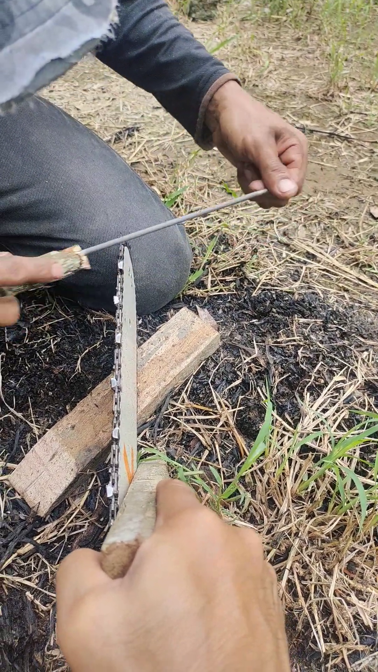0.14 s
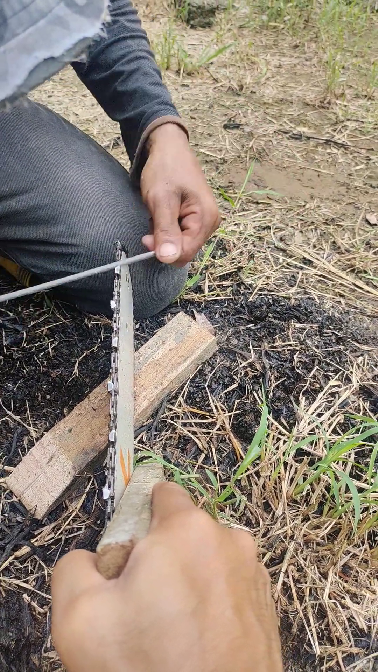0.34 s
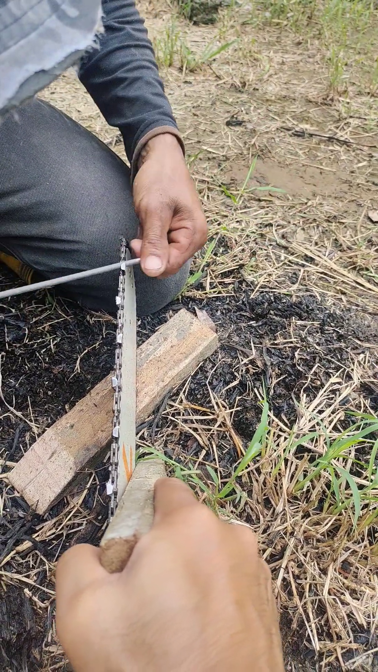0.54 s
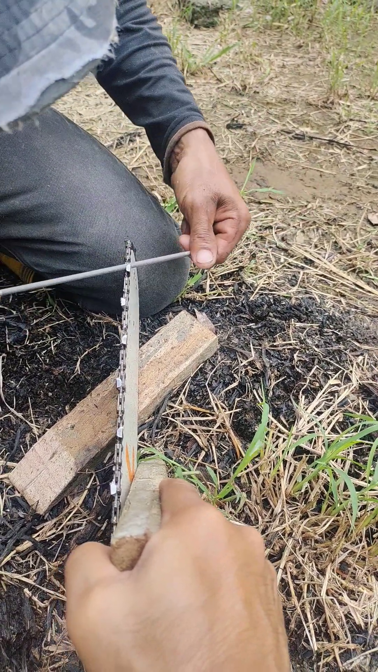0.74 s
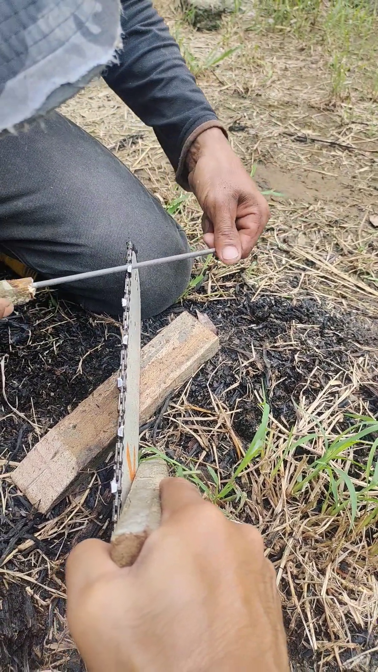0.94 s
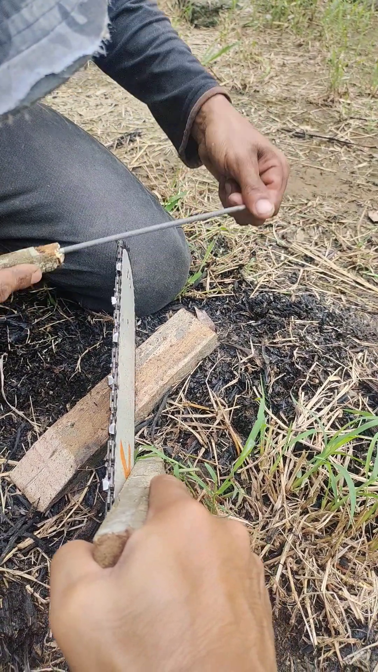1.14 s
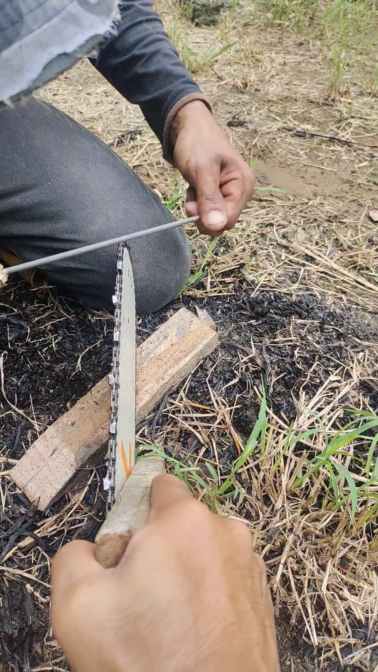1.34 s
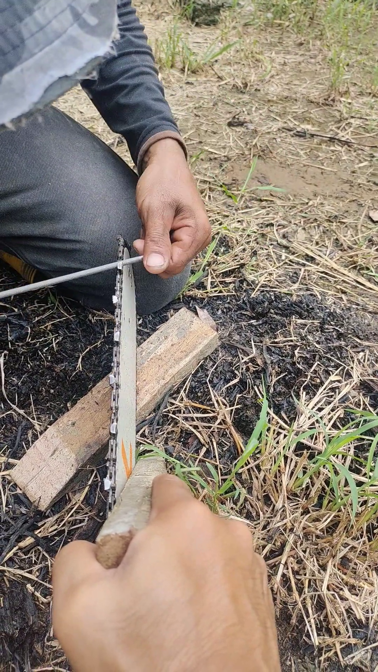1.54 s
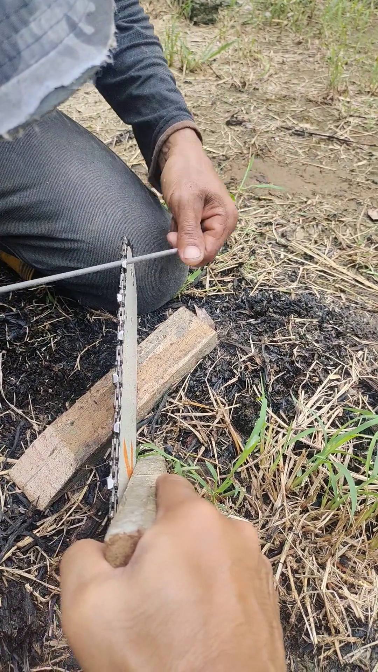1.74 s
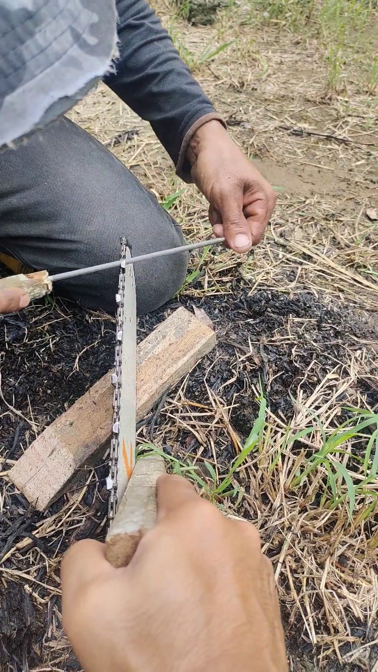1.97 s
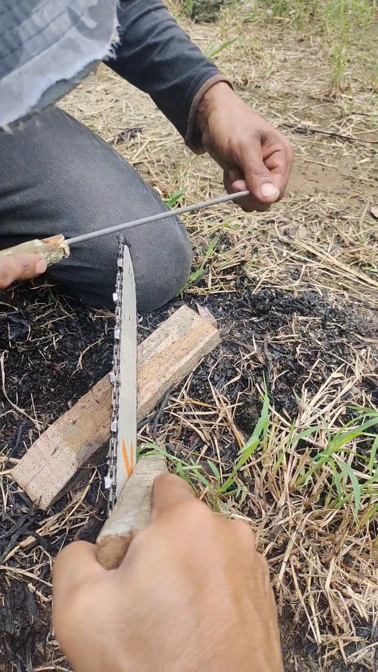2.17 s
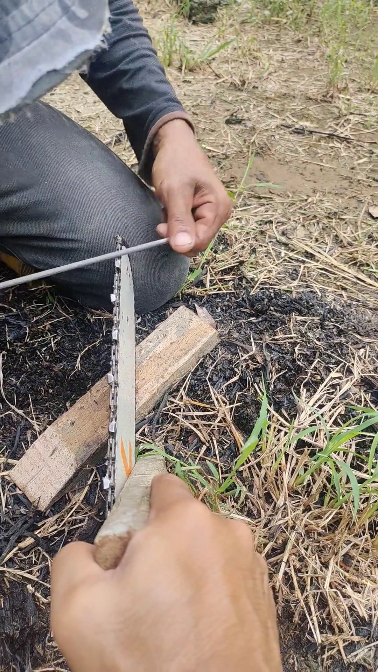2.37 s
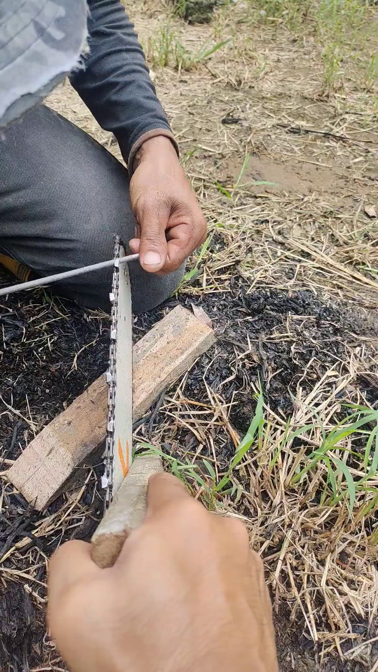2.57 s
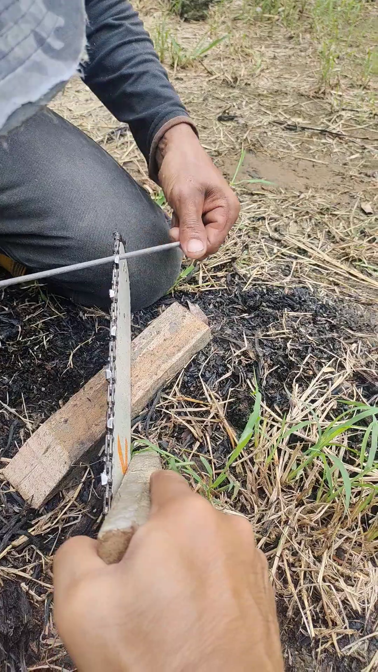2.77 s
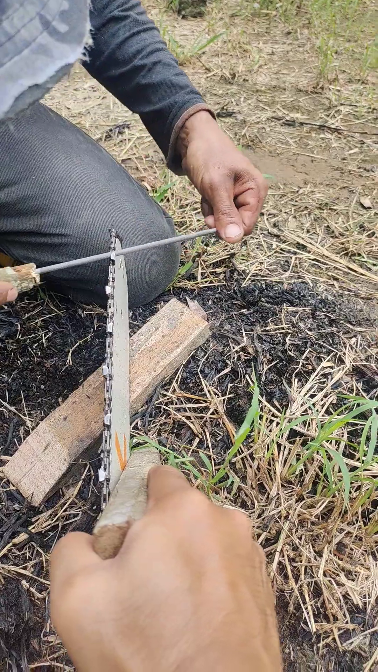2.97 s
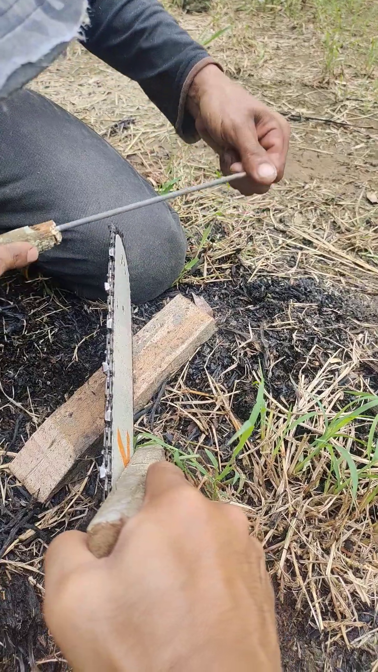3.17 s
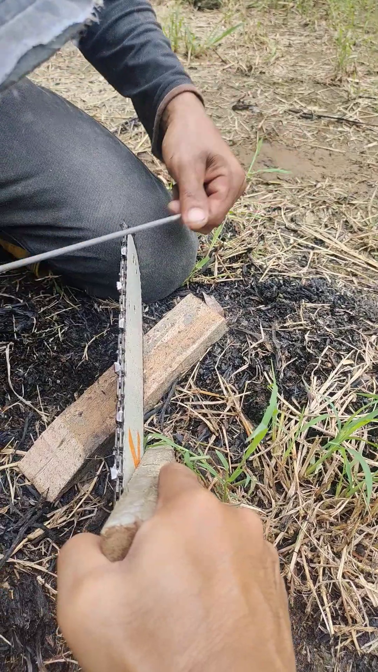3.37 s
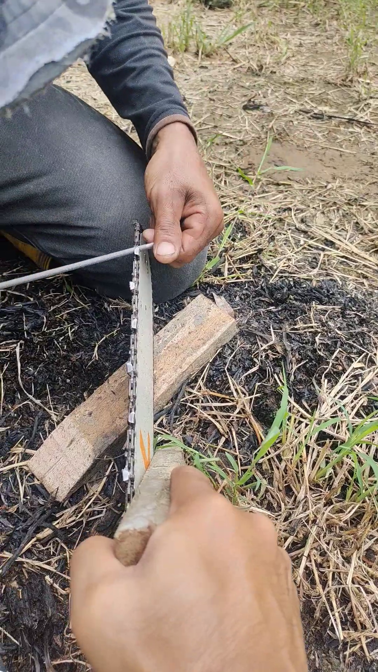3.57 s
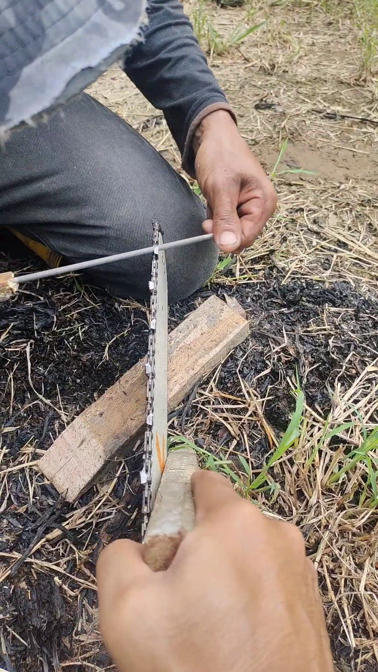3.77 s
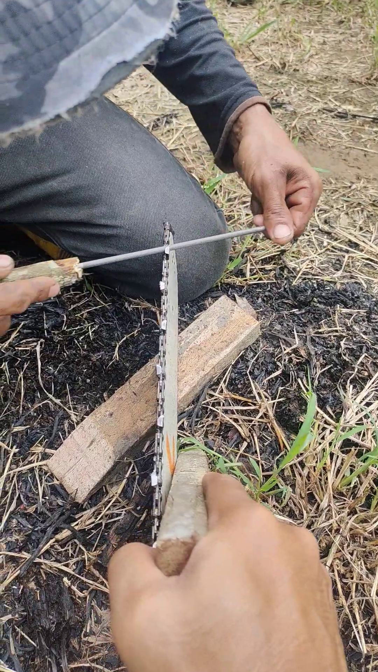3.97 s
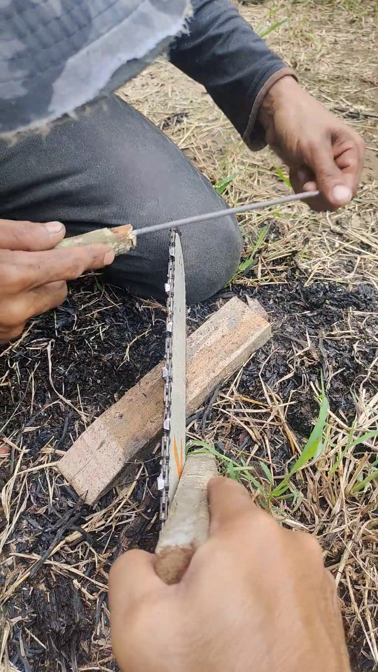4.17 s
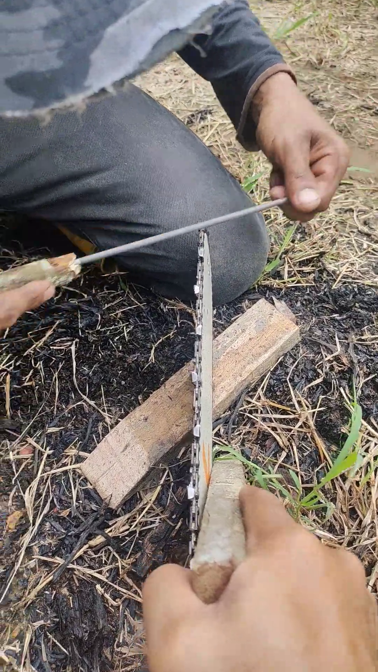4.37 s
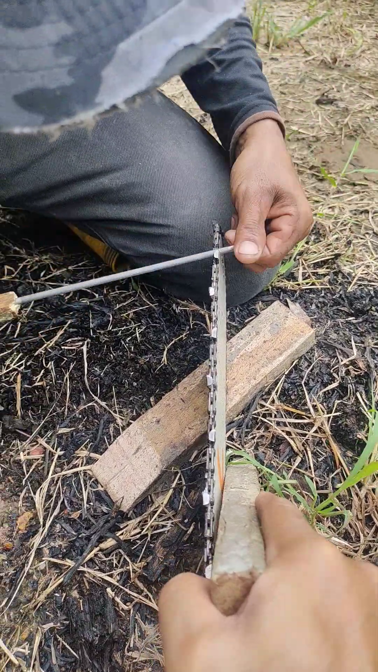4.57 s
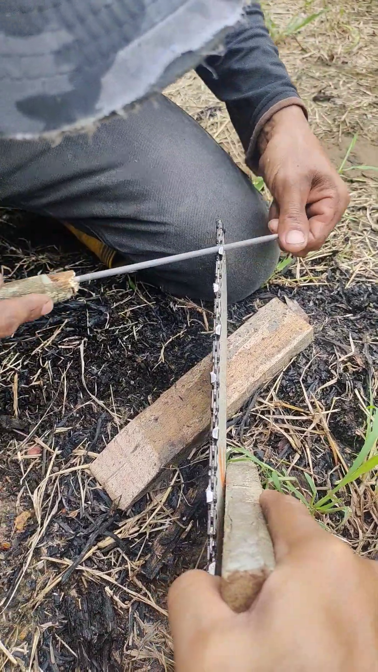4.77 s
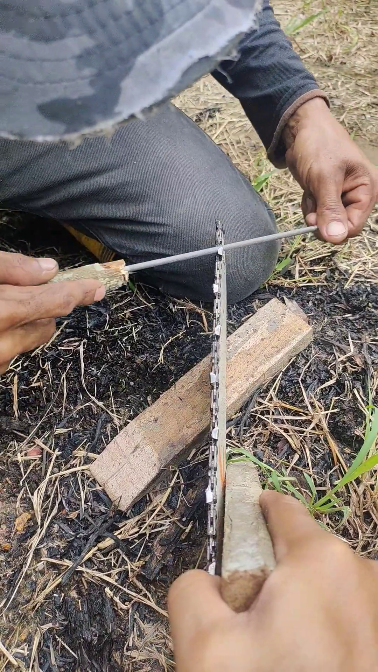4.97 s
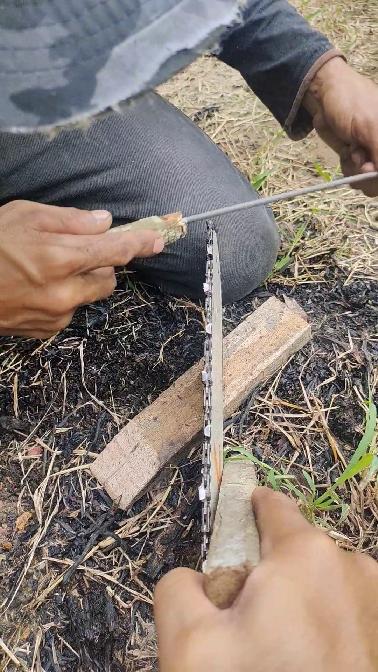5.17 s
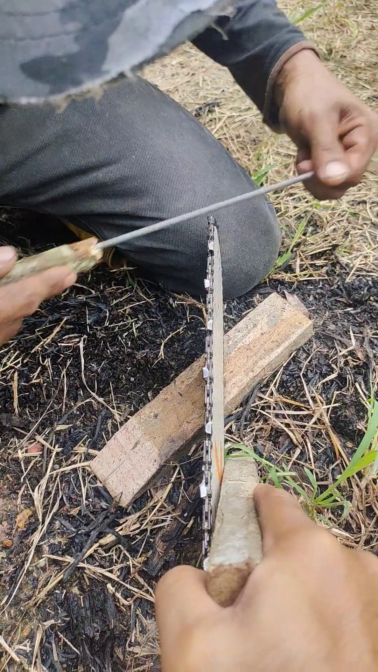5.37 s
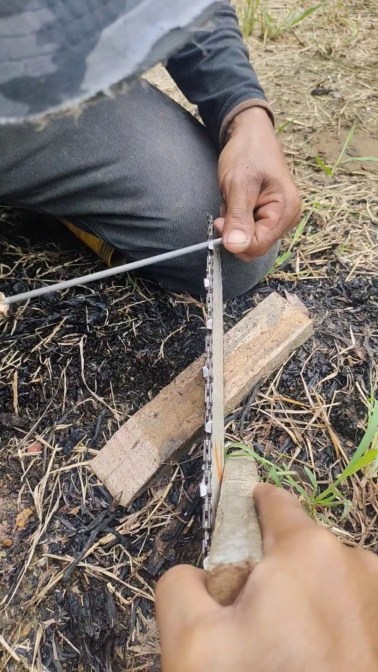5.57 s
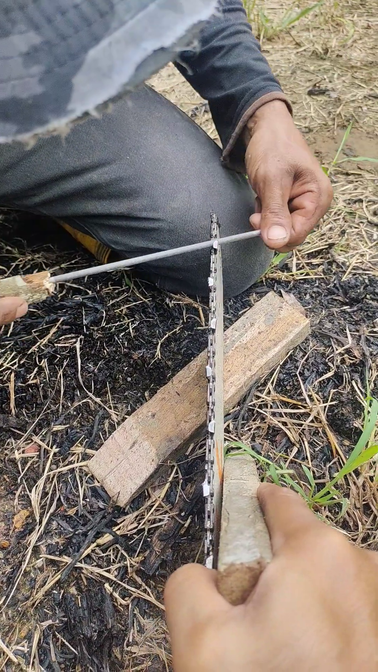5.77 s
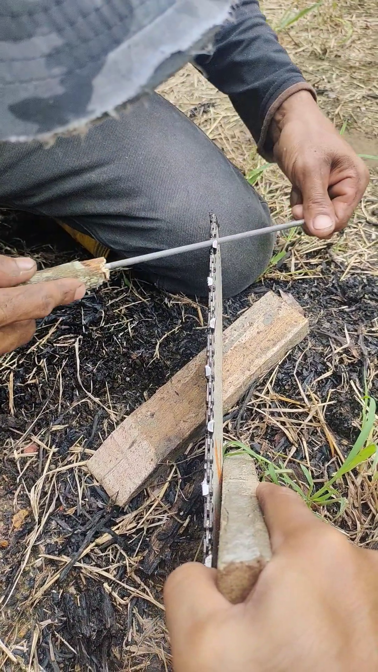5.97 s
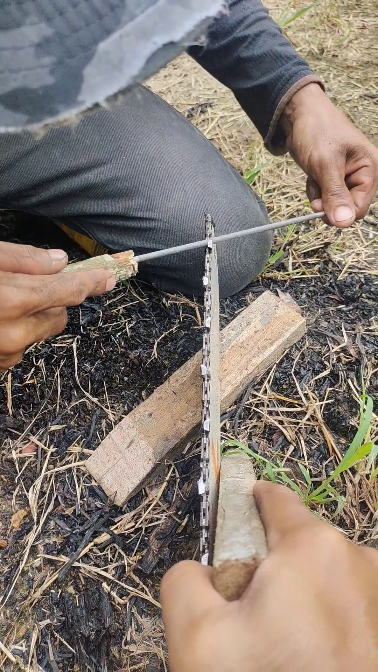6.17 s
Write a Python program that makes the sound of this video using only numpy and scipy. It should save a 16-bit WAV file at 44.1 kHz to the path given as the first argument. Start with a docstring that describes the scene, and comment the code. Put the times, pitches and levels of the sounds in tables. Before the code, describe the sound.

Six full filing strokes follow the tail of an earlier one, heard by a close stereo microphone in dry open air. Each begins with a sharp metallic tick and a brief gritty backward skid, then a longer forward rasp, bright hiss over a buzzing low-mid hum leaning left. Some strokes catch and stutter. Between them only faint rumble, air and thin insect noise remain.

```python
"""Outdoors, close to a two-port microphone, a round file sharpens a saw chain.
Each time the file lands on the cutter, skids back and slows, then rasps forward and lifts off.
Tooth impulses excite resonances of the guide bar and the steel; friction is shaped noise.
Behind it are a low rumble that swells once, soft air and faint insects, all made of filtered noise."""
import sys
import numpy as np
from scipy import signal
from scipy.fft import rfft, irfft, next_fast_len
from scipy.io import wavfile
from scipy.ndimage import uniform_filter1d, map_coordinates

SR = 44100
rng = np.random.default_rng(int(sys.argv[2]) if len(sys.argv) > 2 else 0)


def unload_audio(sound):
    """Save the sound as a 16-bit wav file, at the path given as the first command line argument."""
    columns = np.transpose(np.atleast_2d(sound))
    # keep every value between -1 and 1, then stretch to whole-number steps
    steps = np.round(np.clip(columns, -1, 1) * 32767)
    wavfile.write(sys.argv[1], SR, steps.astype(np.int16))


N = 274302

# left and right port: half of any difference goes to each
SIDE = np.array([[.5], [-.5]])

# Levels in the tables are nominal: each layer adds its own gain.
# resonances of guide bar and chain: (frequency [Hz], width [Hz], level [dB],
# left minus right [dB], left phase lead [rad])
BAR_MODES = [(164, 63, -16, 19, 0.3), (355, 76, 3, 6, 0.97), (765.7, 167, -9, 6, 7.52),
             (887, 270, -11, 11, 3.35), (1228, 244, -18.5, 15, 4.13), (1524, 222, -12.5, 10.5, 4),
             (1619, 77, -7, 9, 4.5), (2313, 600, -25.5, 13.5, 1.37), (2602, 197, -23.5, -10.5, 0.94)]
# spectrum of the cutting hiss: (frequency [Hz], density [dB per Hz])
HISS_SPECTRUM = [(200, -23), (550, 0), (1400, 8), (2000, 5.5), (3100, -2.5), (4000, 4.5), (5200, -2),
                 (7000, 0.5), (9000, -2), (10500, -1), (12200, 0.5), (13400, -3), (14700, -1.5),
                 (16000, -16.5)]
# moments when the bite of the teeth changes: (time [s], nominal change [dB])
BITES = [(.615, 4.5), (.793, -1), (1.768, 0), (1.848, 3), (1.936, 5.5), (2.801, 4.5), (2.966, 5),
         (3.84, 2.5), (3.882, 5), (4.738, 4), (4.85, 5), (4.92, 4), (5.055, 5), (5.68, 5), (5.925, 3)]


def pushes():
    """Forced vibration and chip fracture: the blows of the teeth drive the bar while tearing chips hiss."""
    t = np.arange(N) / SR
    pressure, hiss, swell = hand()
    dig_db = sum(db * np.exp(-((t - s) / 0.017) ** 2) for s, db in BITES)
    grip = unit(amp(1.5 * wobble(170)))
    tooth_rate = 850 * amp(1.5 * wobble(8))
    force = teeth(tooth_rate, scatter=.5, uneven_db=4.0)

    # chips snap off as single sharp grains over the even friction
    snaps = teeth(np.full(N, 520.), scatter=.5, uneven_db=5.5)
    chips = unit(amp(0.62 * wobble(600)) + amp(-11.0) * np.abs(snaps))

    # a bite stirs the boom most and the hiss least
    hum = amp(-1.0 + 1.76 * dig_db) * swell * boom()
    low_modes = amp(-4.0) * pressure * ring(force, BAR_MODES[:2])
    rasp = wander(ring(force * grip, BAR_MODES[2:]), depth_db=4.5)
    body = amp(2.0 + dig_db) * pressure * steady(rasp, size=3000)
    tearing = spray(amp(6.5 + 0.29 * dig_db) * hiss * chips * grip, HISS_SPECTRUM)
    return hum + low_modes + body + wander(tearing, depth_db=5.5)


# forward strokes: (start [s], stop [s], pressure on the cutter [dB], cutting hiss [dB],
# bar boom [dB], easing of the hand [dB/s]; negative easing is a growing push)
STROKES = [(-0.4, 0.028, -48, -55, -49, 5), (0.518, 1.064, -46.5, -50.5, -45, 14),
           (1.631, 2.052, -45, -51, -44, 9.5), (2.574, 3.063, -47.3, -53.5, -44, -1),
           (3.592, 4.09, -46.5, -53.5, -45, -1.5), (4.616, 5.075, -46.5, -52, -47.5, 6.5),
           (5.64, 6.223, -47, -50.5, -45, 13.5)]
# the pressure comes on quickly, the hiss waits for the file to gather speed
PRESS_S, SPEED_UP_S, RELEASE_S = 0.031, 0.075, 0.019
# the file slows along the stroke and its hiss sags; the bar booms most in mid-stroke
HISS_SAG_DB_PER_S, BOOM_ARCH_DB = 4.0, 1
# the bar's rasp follows only this share of the easing
RASP_EASE_SHARE = 0.42


def hand():
    """Contact force and sliding speed set the pressure, hiss and boom envelopes of each forward stroke."""
    t = np.arange(N) / SR
    pressure, hiss, swell = np.zeros((3, N))
    for start, stop, pressure_db, hiss_db, boom_db, ease_db_per_s in STROKES:
        age = np.clip(t - start, 0, stop - start)
        off_centre = 2 * age / (stop - start) - 1
        pressed = held(start, stop, PRESS_S, RELEASE_S)
        moving = held(start, stop, SPEED_UP_S, RELEASE_S)
        pressure += pressed * amp(pressure_db - RASP_EASE_SHARE * ease_db_per_s * age)
        hiss += moving * amp(hiss_db - (ease_db_per_s + HISS_SAG_DB_PER_S) * age)
        swell += pressed * amp(boom_db - BOOM_ARCH_DB * off_centre ** 2)
    return pressure, hiss, swell


def boom():
    """Bending resonance of the bar: a narrow-band, restless hum, stronger at the left port."""
    slow = wobble(60) + 1j * wobble(60)
    quick = wobble(150) + 1j * wobble(150)
    sway = steady((slow + 0.37 * quick)[None], size=1800)
    hum_hz = 360 + 9 * wobble(9)
    hum = sway * np.exp(2j * np.pi * np.cumsum(hum_hz) / SR)
    left_lead = np.exp(1j * SIDE * 0.9)  # radians
    return unit(np.real(hum * left_lead)) * amp(SIDE * 5.3)


# backward skids: (start [s], stop [s], rattle [dB], share of the skid at which it is firmest [0-1],
# steel [dB])
SKIDS = [(0.369, 0.489, -41.5, 0.45, -46.5), (1.459, 1.59, -41.5, 0.36, -50),
         (2.421, 2.535, -42, 0.27, -46.5), (3.439, 3.556, -37, 0.28, -48), (4.468, 4.583, -40.5, 0.28, -44),
         (5.475, 5.6, -40.5, 0.14, -42.5)]
# spectrum of the grating: (frequency [Hz], density [dB per Hz])
GRATE_SPECTRUM = [(250, -31), (560, -5), (750, 6), (1100, 11), (1500, 7.5), (2200, -11), (3200, -64),
                  (6000, -44)]
# resonances of file and cutter steel: (frequency [Hz], width [Hz], level [dB],
# left minus right [dB], left phase lead [rad])
STEEL_MODES = [(1200, 200, -3, -15, 0), (2255, 910, 3, 3, 2), (2853, 50, -2.5, -18, 7.5),
               (3790, 75, 4.5, -9, 2), (4116, 840, 3.5, -0.5, 1.5), (4700, 49, 0, 4, 4),
               (6030, 260, -1, 0, -1.5), (8200, 1100, -10.5, -13.5, 1), (10010, 620, -2.5, -5, -1.5),
               (12600, 480, -11, 5, 4.5)]
# spectrum of steel scuffing on steel: (frequency [Hz], density [dB per Hz])
SCUFF_SPECTRUM = [(200, -47), (600, 7), (1500, 9), (3200, 3.5), (4500, -1.5), (7000, 1.5), (9000, -5.5),
                  (11000, -7), (13500, -13), (16000, -11)]


def skids():
    """Tooth-passing excitation: drawn back lightly, the file rattles more slowly and dully until it stops."""
    t = np.arange(N) / SR
    speed, rattle, steel = np.zeros((3, N))
    for start, stop, rattle_db, firmest, steel_db in SKIDS:
        on = (t >= start) & (t < stop)
        gone = (t[on] - start) / (stop - start)
        speed[on] = 1 - gone
        rattle[on] = amp(rattle_db - 20 * (gone - firmest) ** 2) * np.clip(speed[on] / 0.27, 0, 1)
        # the treble needs speed and is the first to go
        steel[on] = amp(steel_db - 13.3 * gone - 20 * gone ** 2)

    # the tooth rate, heard as a rough falling pitch, follows the speed
    force = rattle * teeth(350 + 1200 * speed, scatter=0.21, uneven_db=4.0)
    chatter = unit(amp(2.7 * wobble(550) + 1.1 * wobble(120)))

    def grate_response(f):
        left_lead = np.minimum(f / 350, np.pi)  # radians
        return unit(amp(along(GRATE_SPECTRUM, f) + SIDE * 5.3) * np.exp(1j * SIDE * left_lead))

    low_modes = amp(1.0) * ring(force, BAR_MODES[:2])
    high_modes = amp(2.0) * wander(ring(force, BAR_MODES[2:]), depth_db=2)
    grate = amp(-3.5) * filtered(force, grate_response)
    squeak = amp(8.5) * ring(steel * chatter * rng.standard_normal(N), STEEL_MODES)
    scuff = spray(chatter * (amp(-0.5) * steel + amp(-13) * rattle), SCUFF_SPECTRUM)
    return low_modes + high_modes + grate + wander(squeak + scuff, depth_db=1.5)


# the file slips off at the end of a stroke: (time [s], level [dB], half length to 1/e [s])
LIFTS = [(1.076, -38.5, 0.0084), (2.054, -43, 0.013), (3.069, -37.5, 0.004), (4.089, -42, 0.0097),
         (5.088, -35, 0.0063)]


def lifts():
    """Brief excitation at unloading: the file skips over the edge with a short chirp of steel."""
    t = np.arange(N) / SR
    skip = sum(amp(db) * np.exp(-((t - s) / half) ** 2) for s, db, half in LIFTS)
    force = skip * teeth(np.full(N, 1400.), scatter=.4, uneven_db=4.0)
    low_steel = amp(-7.0) * ring(force, STEEL_MODES[1:3])
    high_steel = amp(-7.0) * ring(force, STEEL_MODES[3:6])
    bar = amp(-3) * ring(force, BAR_MODES[2:])
    return low_steel + high_steel + bar + spray(amp(-4) * skip, SCUFF_SPECTRUM)


# the file knocks on a cutter: (time [s], peak [dB], bar knock relative to the peak [dB])
KNOCKS = [(0.3427, -25, -8.5), (0.3644, -26, -9.5), (0.3925, -45, -21), (1.069, -34, 2.5),
          (1.4566, -32.5, -4.5), (2.3912, -36.5, -4.5), (2.4159, -28.5, -6), (3.062, -39.5, 4.5),
          (3.4152, -35.5, -4.5), (3.437, -41, 3), (4.4537, -39.5, 5), (5.0824, -33.5, 3.5),
          (5.4747, -26, -8.5)]
# a tooth catches on the edge: (time [s], peak [dB])
CATCHES = [(0.6796, -35.5), (0.772, -45.5), (1.6202, -49), (2.5718, -45), (2.5993, -42.5), (3.6043, -46.5),
           (3.6508, -31.5), (3.722, -36), (3.776, -44.5), (3.835, -39), (3.877, -47), (4.6221, -47),
           (5.634, -42.5)]


def knocks():
    """Impact of steel on steel: a crack, a knock in the bar, and a faint ring that outlasts them."""
    steel = sum(amp(db) * burst(s, t60=0.029) for s, db, knock_db in KNOCKS)
    bar = sum(amp(db + knock_db) * burst(s, t60=0.066) for s, db, knock_db in KNOCKS)
    catch = sum(amp(db) * burst(s, t60=0.038) for s, db in CATCHES)
    grit = rng.standard_normal(N)

    # after a clean blow the high modes ring longer than under the damping of a rub
    free_modes = [(hz, 0.48 * width, db, pan, lead) for hz, width, db, pan, lead in STEEL_MODES[3:]]
    clink = amp(-18.0) * ring(steel * grit, STEEL_MODES) + amp(-8.5) * ring(steel * grit, free_modes)
    crack = spray(amp(-9.5) * steel, SCUFF_SPECTRUM)
    crack = crack + spray(amp(-10) * steel + amp(-2.5) * catch, HISS_SPECTRUM)
    knock = ring(grit * (amp(-0.5) * bar + amp(-1) * catch), BAR_MODES)
    return clink + crack + knock


# spectrum of the soft air: (frequency [Hz], density [dB per Hz])
AIR_SPECTRUM = [(200, -11), (560, -9.5), (1000, -14.5), (2000, -18.5), (3800, -25.5), (6500, -26.5),
                (9400, -30), (15800, -33)]
# spectrum of the low rumble: (frequency [Hz], density [dB per Hz])
RUMBLE_SPECTRUM = [(20, -35), (45, -17), (56, -19), (66, 2.5), (95, 1), (160, 3.5), (200, 2), (260, -7.5),
                   (430, -8.5), (600, -45), (1200, -51)]
# one insect trills in bouts: (start [s], stop [s])
TRILLS = [(-0.3, 2.6), (3.8, 4.46)]
CHORUS_DB, TRILL_DB, TRILL_FADE_S = -73.3, -73.5, 0.27
# the low rumble swells once, as from handling, for this half length to 1/e
RUMBLE_DB, SWELL_DB, SWELL_AT_S, SWELL_HALF_S = -54.5, 5, 5.89, 0.17


def outdoors():
    """Ambient noise: a largely coherent low rumble that swells once, uneven air, and two insect bands."""
    t = np.arange(N) / SR

    def noise(colour, channels):
        return unit(filtered(rng.standard_normal((channels, N)), colour))

    def low(f):
        return amp(along(RUMBLE_SPECTRUM, f))

    def airy(f):
        return amp(along(AIR_SPECTRUM, f)) * f / (f + 100)

    def band(hz, width_hz):
        return noise(lambda f: np.exp(-((f - hz) / width_hz) ** 2), channels=2)

    rumble = amp(RUMBLE_DB + SWELL_DB * np.exp(-((t - SWELL_AT_S) / SWELL_HALF_S) ** 2))
    # mostly the same at both ports, with a little of each port's own
    ground = rumble * (noise(low, channels=1) + amp(-17.0) * noise(low, channels=2))
    air = amp(-60.0 + 0.91 * wobble(3.53)) * noise(airy, channels=2)
    chorus = amp(CHORUS_DB) * band(hz=7300, width_hz=1150)
    bouts = sum(held(start, stop, TRILL_FADE_S, TRILL_FADE_S) for start, stop in TRILLS)
    trill = amp(TRILL_DB) * bouts * band(hz=5320, width_hz=610)
    return ground + air + chorus + trill


def teeth(rate, scatter, uneven_db):
    """Impulse train: one blow per passing tooth, uneven in time and size, with equal power at any rate."""
    passed = np.cumsum(rate) / SR
    draws = rng.standard_normal((int(passed[-1]), 2))
    due = np.arange(len(draws)) + scatter * draws[:, 0]
    at = np.searchsorted(passed, due).clip(0, N - 1)
    size = amp(uneven_db * draws[:, 1]) / np.sqrt(rate[at])
    hits = np.bincount(at, size, N)
    return unit(hits - uniform_filter1d(hits, size=256))


def ring(force, modes):
    """Modal superposition: steep causal resonances of unit power, each with its own port level and phase."""
    def response(f):
        h = 0
        for centre, width, db, pan, lead in modes:
            resonance = 1j * f * width / (centre * centre - f * f + 1j * f * width)
            h = h + amp(db + SIDE * pan) * np.exp(1j * SIDE * lead) * resonance ** 2
        return h / np.sqrt(np.mean(abs(h) ** 2))
    return filtered(force, response)


# the two ports hear the treble differently: (frequency [Hz], left minus right [dB])
PORT_BALANCE = [(550, -12), (900, 4), (1800, 3.5), (3000, -2), (5300, 4.5), (7000, -1), (9000, -5),
                (11000, -4), (13000, -2.5), (15000, 10)]


def spray(envelope, spectrum):
    """Friction noise with arrival-time difference: direct sound meets the right port first, the rest scatters."""
    delay_s = 0.000357
    direct = filtered(envelope * rng.standard_normal(N), lambda f: np.exp(-2j * np.pi * f * SIDE * delay_s))
    scattered = envelope * rng.standard_normal((2, N))

    def colour(f):
        return unit(amp(along(spectrum, f) + SIDE * along(PORT_BALANCE, f)))
    return filtered(0.42 * direct + 0.95 * scattered, colour)


def wander(x, depth_db):
    """Moving contact point: narrow bands of the sound come and go, partly independently at each port."""
    z = signal.stft(x, nperseg=1024)[2]
    field = rng.standard_normal(z.shape[1:]) + 2.4 * rng.standard_normal(z.shape)
    # smooth over neighbouring frequencies, then over time
    for _ in range(2):
        field = uniform_filter1d(uniform_filter1d(field, size=5, axis=1), size=9, axis=2)
    gain = amp(depth_db * np.minimum(unit(field), 1.2))
    return signal.istft(z * unit(gain), nperseg=1024)[1][..., :N]


def steady(x, size):
    """Level normalization: even out the slow swells of a vibration by its running power."""
    power = np.abs(uniform_filter1d(np.mean(abs(x) ** 2, axis=0), size=size))
    return x / np.sqrt(power + 1e-9)


def burst(s, t60):
    """Exponential decay of one contact: instant rise, then 60 dB down in t60 seconds."""
    age = np.arange(N) / SR - s
    return (age >= 0) * amp(-60 * np.abs(age) / t60)


def held(start, stop, attack_s, release_s):
    """Linear envelope: rises from start, holds until stop and is then released."""
    t = np.arange(N) / SR
    return np.clip((t - start) / attack_s, 0, 1) * np.clip(1 - (t - stop) / release_s, 0, 1)


def wobble(rate):
    """Spline interpolation of noise: a smooth random curve with rate knots a second."""
    knots = rng.standard_normal(int(N * rate / SR) + 4)
    return map_coordinates(knots, [np.arange(N) * rate / SR])


def filtered(x, response):
    """Linear filtering: the spectrum of x times a complex response of frequency."""
    m = next_fast_len(N + SR // 2)
    return irfft(rfft(x, m) * response(np.fft.rfftfreq(m, 1 / SR)), m)[..., :N]


def along(points, hz):
    """Logarithmic frequency scale: interpolate (frequency [Hz], value) points on it."""
    f, v = np.transpose(points)
    return np.interp(np.log(hz + 1), np.log(f + 1), v)


def amp(db):
    """Decibel definition: level to amplitude gain."""
    return 10 ** (np.asarray(db) / 20)


def unit(x):
    """Root-mean-square normalization: scale to rms 1."""
    return x / np.sqrt(np.mean(x ** 2) + 1e-20)


def scene():
    """Superposition: filing strokes and contacts in the open air."""
    return pushes() + skids() + lifts() + knocks() + outdoors()


TOP_HZ = 15800


def record(dry):
    """Band limiting: the recorder keeps nothing from its top frequency upward."""
    return filtered(dry, lambda hz: hz < TOP_HZ)


dry = scene()
out = record(dry)
unload_audio(out)
```